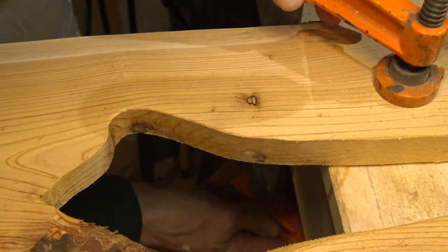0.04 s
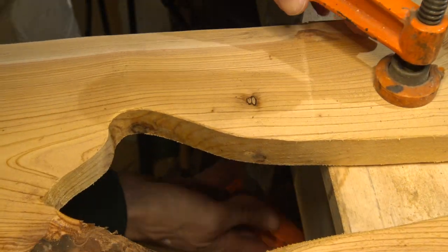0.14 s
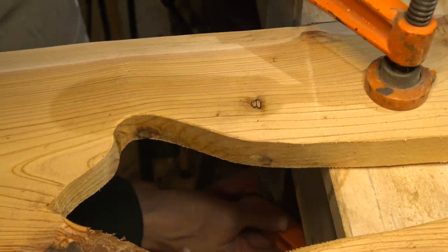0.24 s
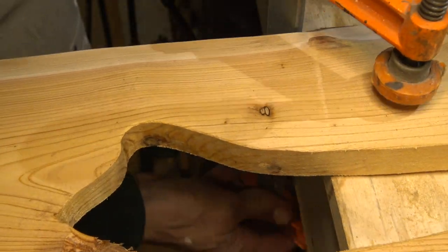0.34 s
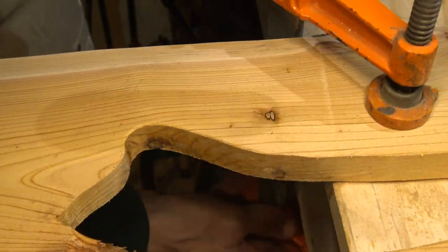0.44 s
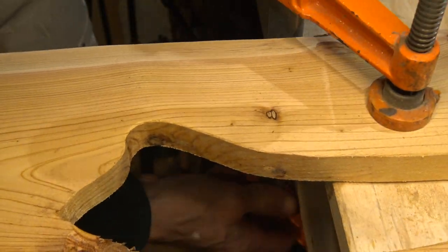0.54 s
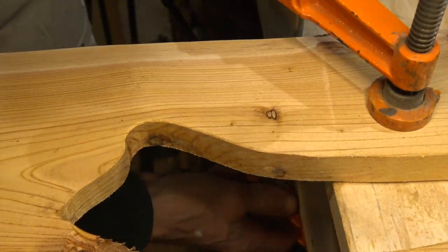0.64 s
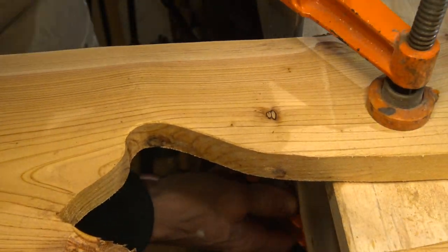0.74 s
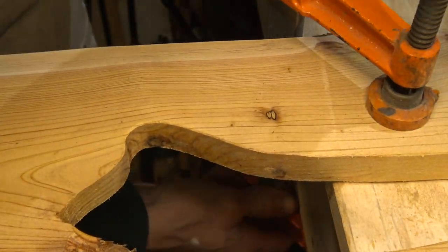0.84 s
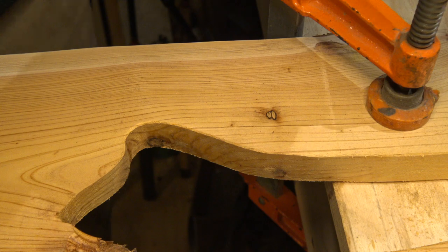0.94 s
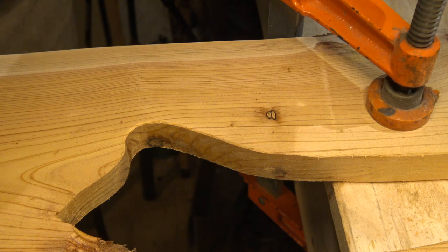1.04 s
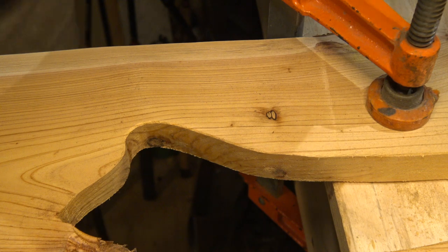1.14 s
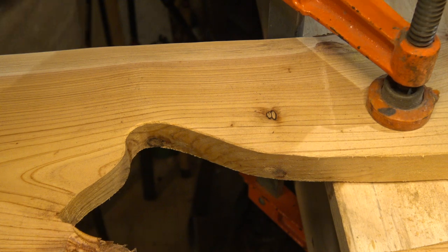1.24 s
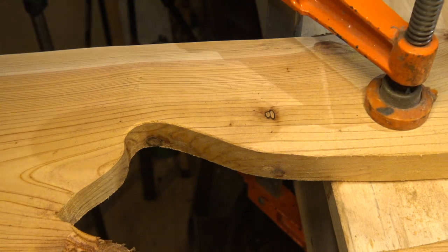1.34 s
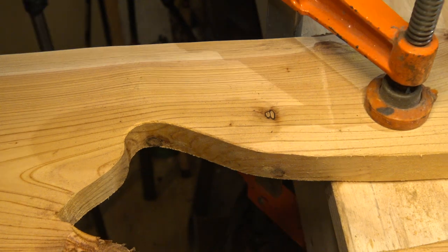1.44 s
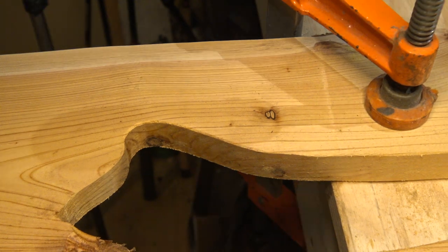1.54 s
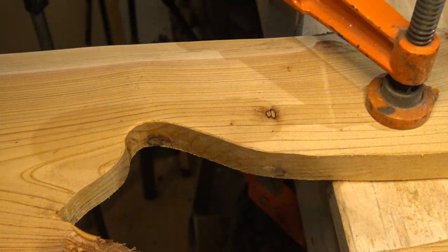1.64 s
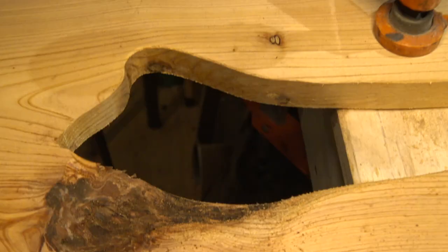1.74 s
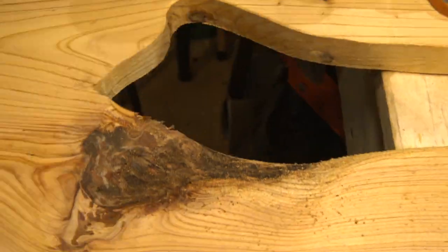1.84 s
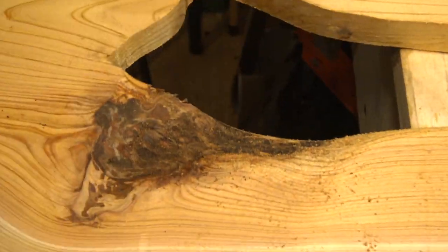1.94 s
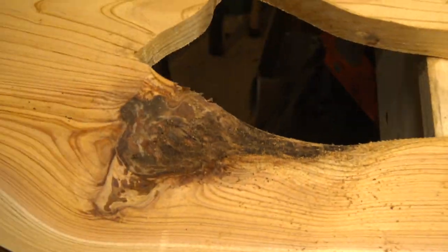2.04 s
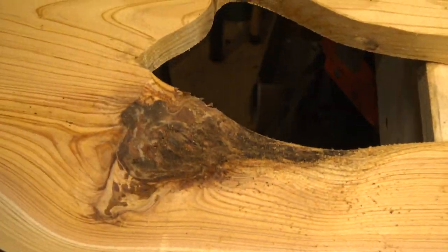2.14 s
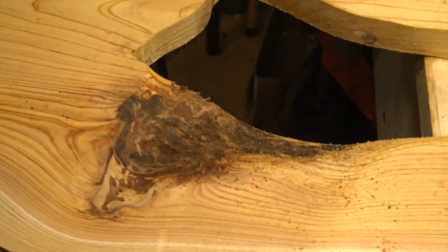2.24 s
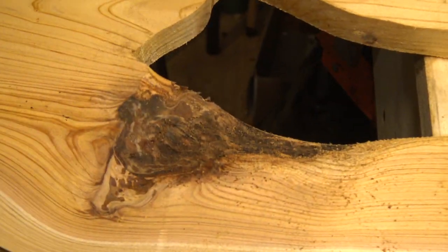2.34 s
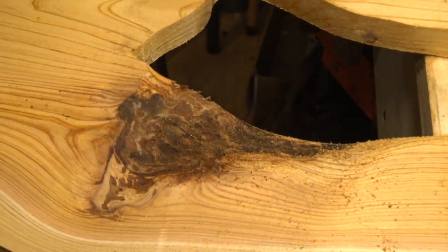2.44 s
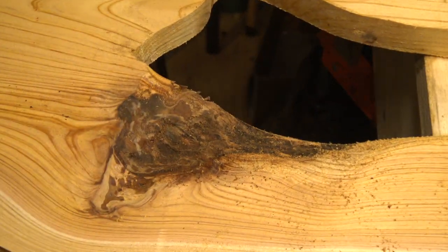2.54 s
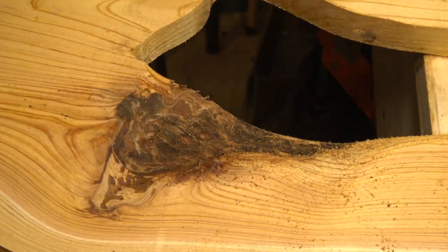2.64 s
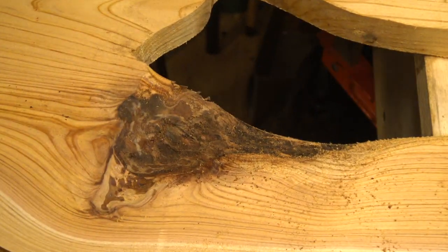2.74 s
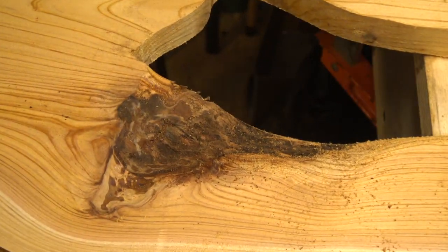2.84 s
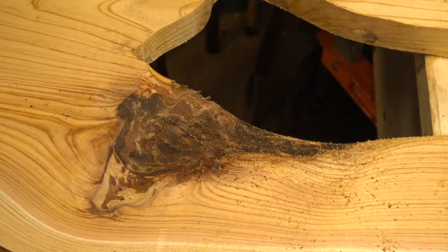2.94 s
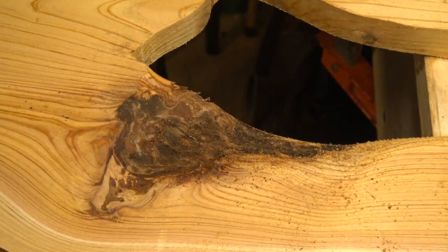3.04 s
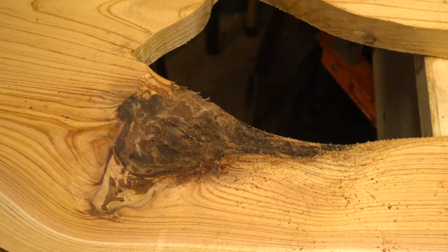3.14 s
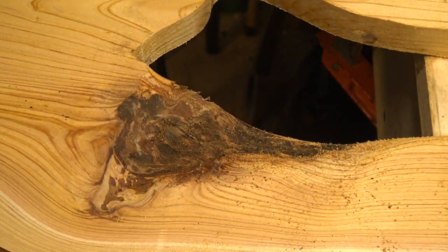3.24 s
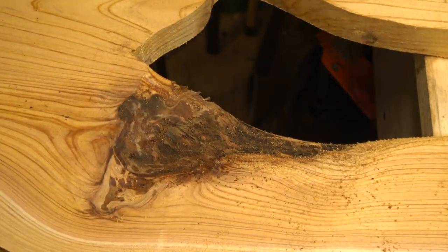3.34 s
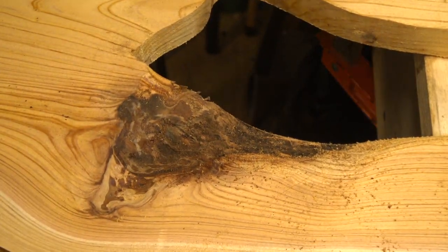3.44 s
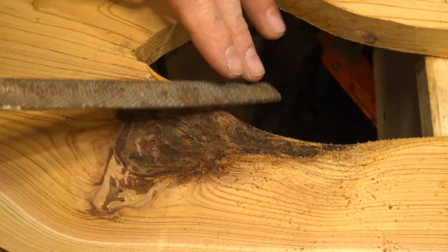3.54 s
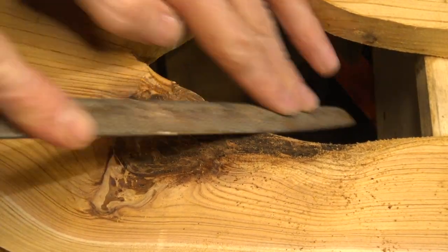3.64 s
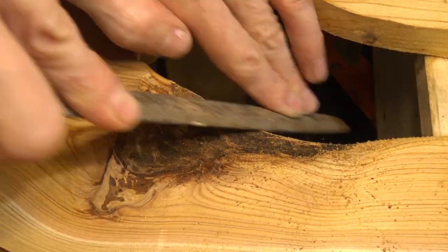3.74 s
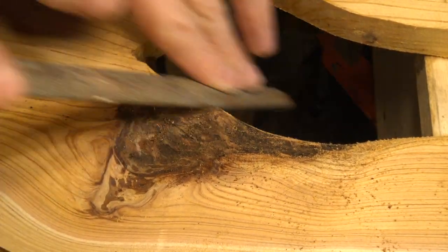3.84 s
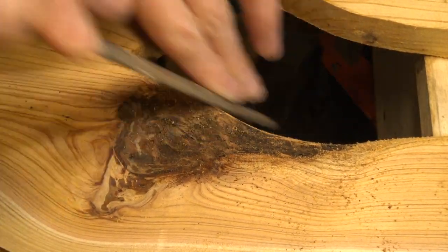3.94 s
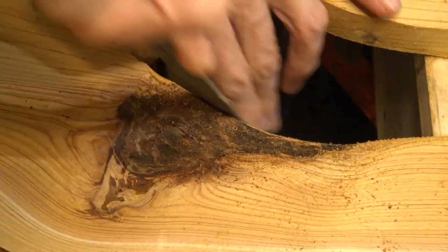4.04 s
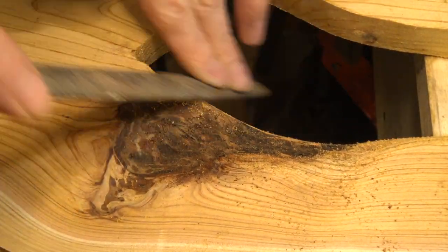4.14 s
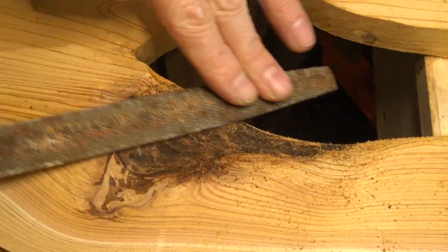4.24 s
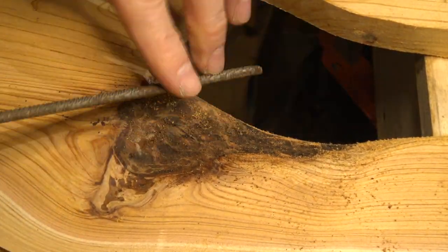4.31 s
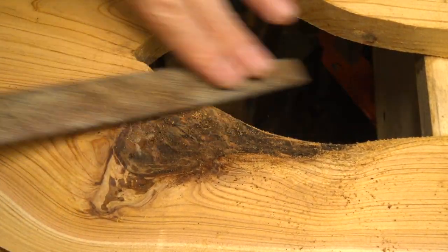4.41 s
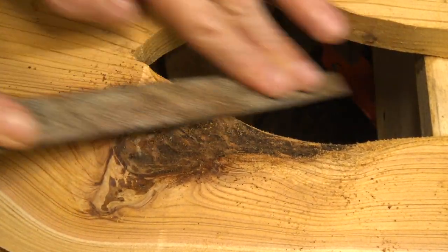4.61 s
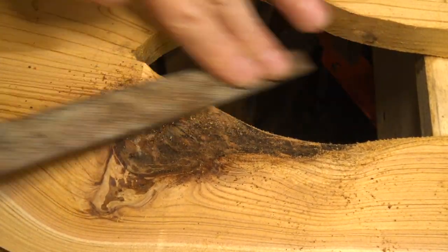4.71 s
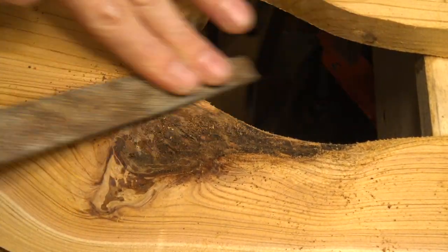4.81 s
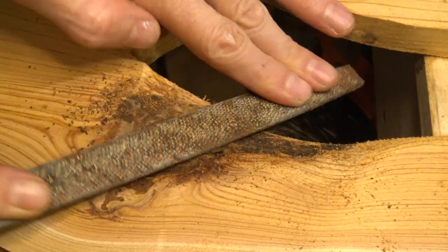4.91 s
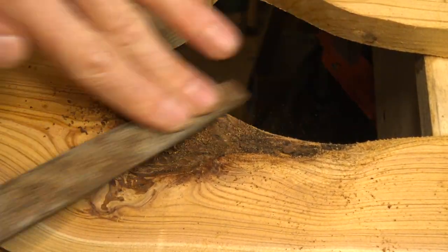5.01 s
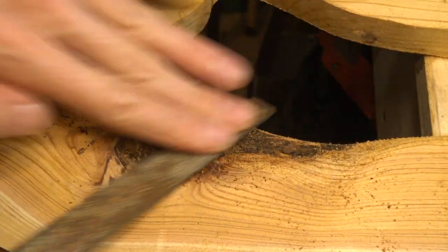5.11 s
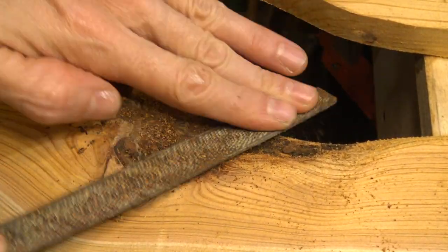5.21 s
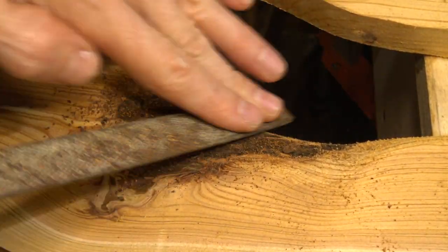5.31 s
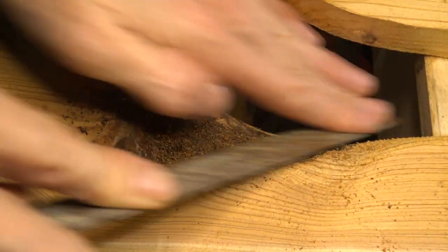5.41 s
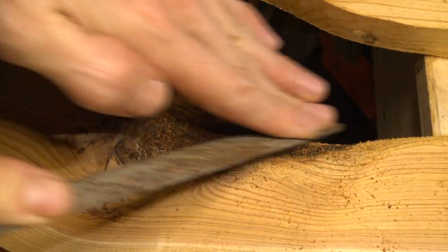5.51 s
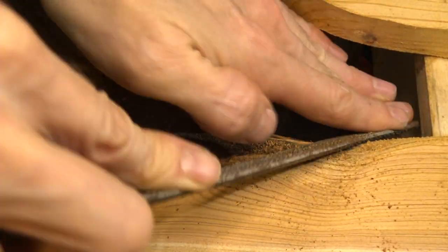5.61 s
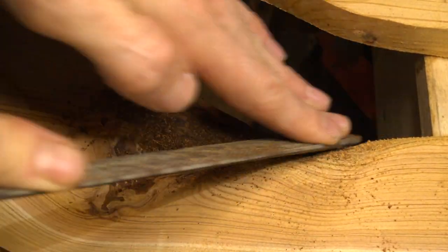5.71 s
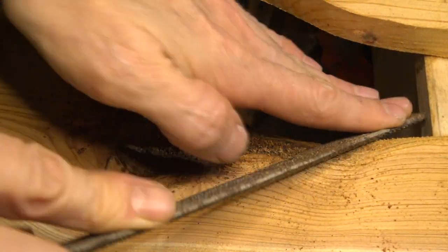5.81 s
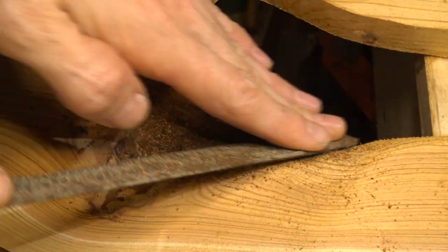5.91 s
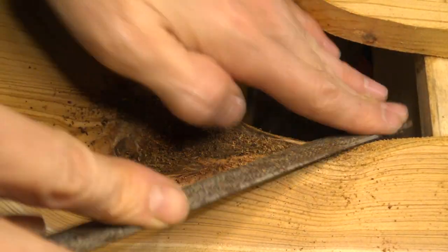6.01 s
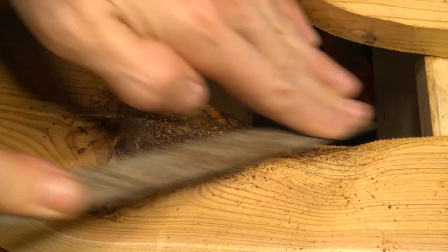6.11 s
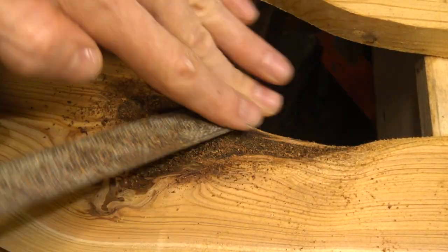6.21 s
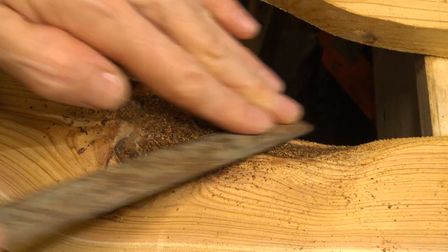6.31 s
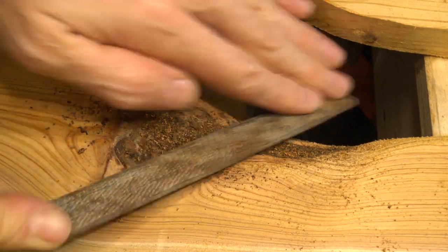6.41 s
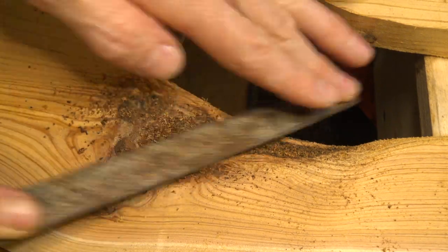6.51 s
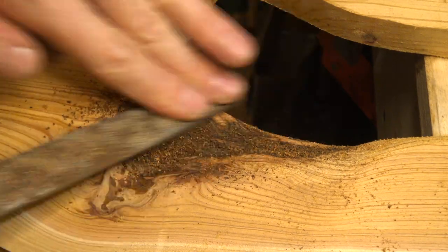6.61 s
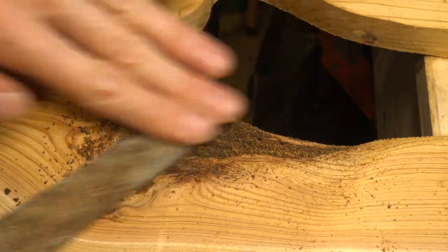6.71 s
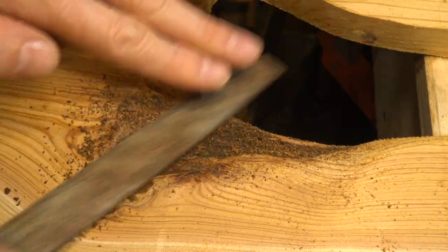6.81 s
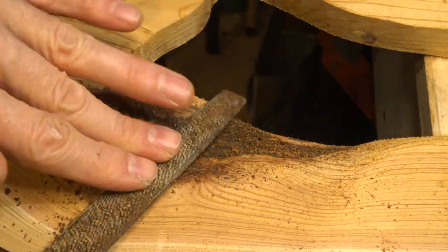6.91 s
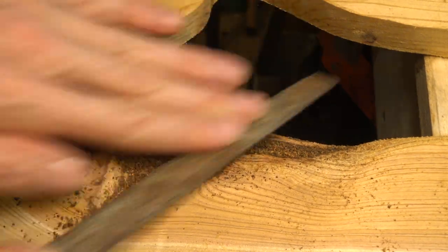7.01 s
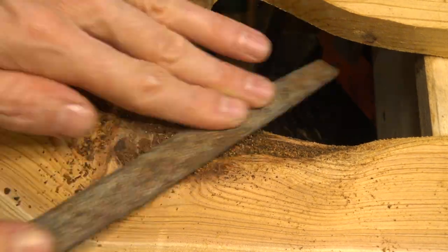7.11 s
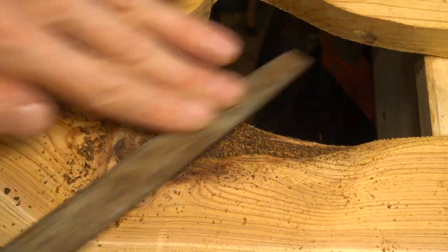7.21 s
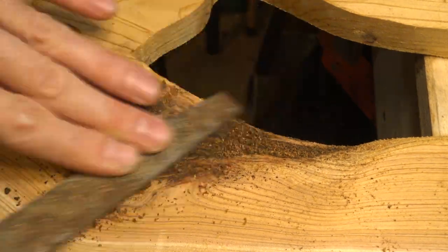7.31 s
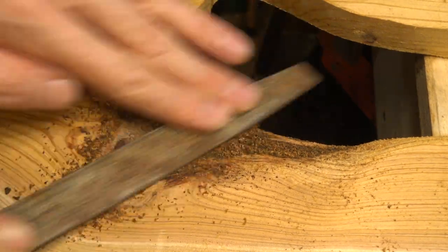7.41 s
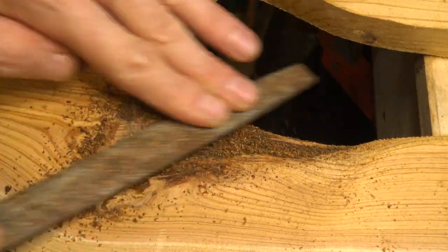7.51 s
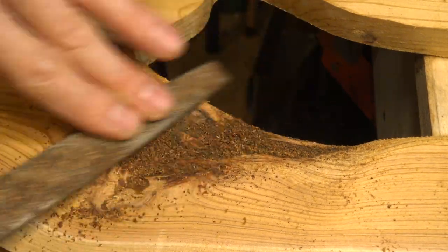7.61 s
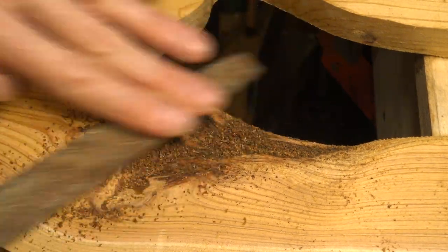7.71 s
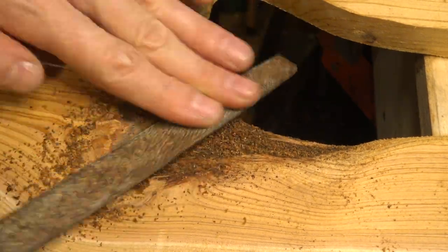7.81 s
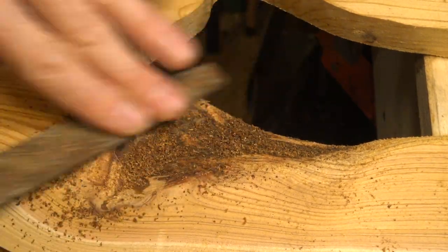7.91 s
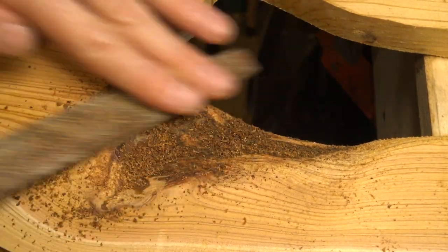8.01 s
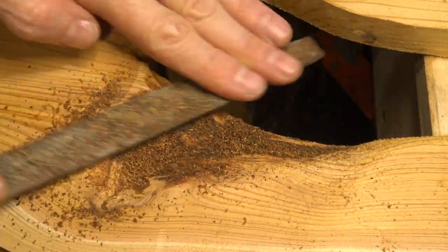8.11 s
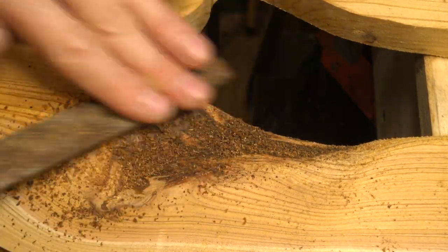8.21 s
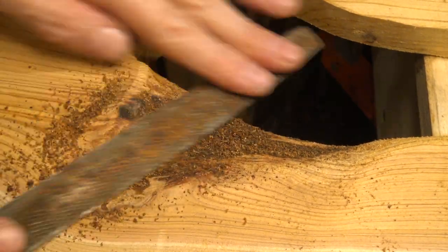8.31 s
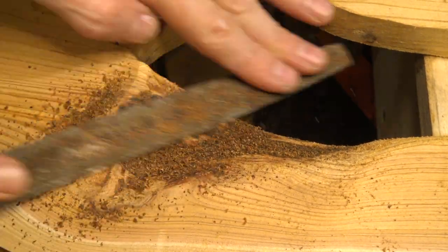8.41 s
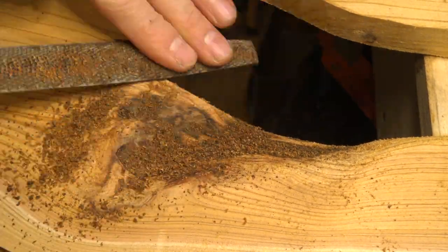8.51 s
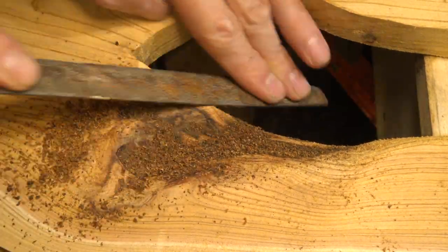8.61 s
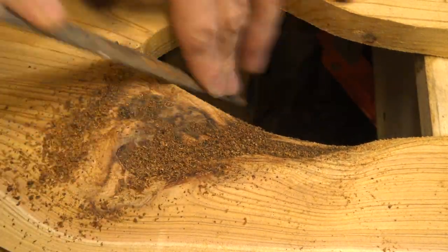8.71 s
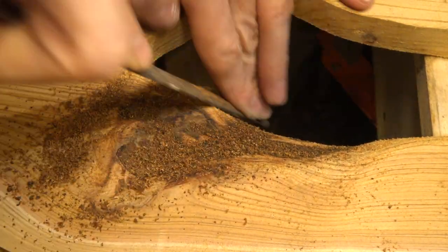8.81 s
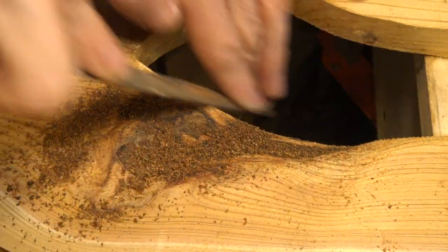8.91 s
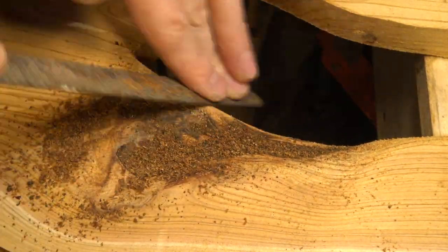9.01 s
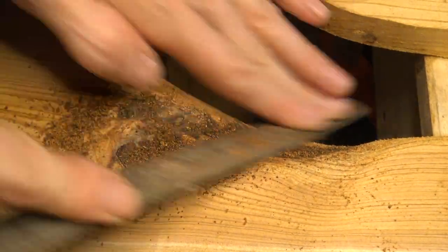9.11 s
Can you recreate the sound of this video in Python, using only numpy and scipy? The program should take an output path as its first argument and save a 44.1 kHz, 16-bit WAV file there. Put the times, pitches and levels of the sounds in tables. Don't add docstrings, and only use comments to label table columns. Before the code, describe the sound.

In a small workshop heard many times faster than life, a clamp bumps along a bench and clanks as its screw tightens in the first second and a half. Faint hiss and thin steady tones remain, with a few tiny ticks. Then a steel rasp saws at wood dozens of strokes a second, a gritty, bright, fluttering buzz with brief gaps, close and dry in stereo.

```python
import sys
import numpy as np
from scipy import signal
from scipy.fft import rfft, irfft
from scipy.io import wavfile
from scipy.ndimage import uniform_filter1d, map_coordinates

SR = 44100
rng = np.random.default_rng(int(sys.argv[2]) if len(sys.argv) > 2 else 0)


def digitize_waveform(pressure):
    field = np.atleast_2d(pressure).T
    bounded = np.clip(field, -1, 1)
    quanta = np.round(bounded * 32767).astype(np.int16)
    wavfile.write(sys.argv[1], SR, quanta)


def invert_db(level):
    return 10 ** (np.asarray(level, dtype=float) / 20)


N = 403515
TIME = np.arange(N) / SR


def evened(x):
    return x / np.sqrt(np.mean(x ** 2) + 1e-20)


def wander(samples):
    return evened(uniform_filter1d(rng.standard_normal(N), samples))


def read(points, hz):
    f, value = np.transpose(points)
    return np.interp(np.log(hz + 1), np.log(f + 1), value)


def ring(x, modes, valley_db):
    hz = np.fft.rfftfreq(8192, 1 / SR)
    power = sum(invert_db(db) ** 2 / (1 + (2 * (hz - f) / w) ** 2) ** 2 for f, w, db in modes)
    fold = irfft(np.log(power + invert_db(valley_db) ** 2) / 2)
    fold[1:4096] *= 2
    fold[4097:] = 0
    taps = irfft(np.exp(rfft(fold)))[:4096]
    return signal.oaconvolve(x, taps / np.linalg.norm(taps))[:N]


def grit(lumpy_db, count):
    lumps = np.clip(wander(count), -3, 1.8)
    return evened(rng.standard_normal(N) * invert_db(lumpy_db * lumps))


def thin(x):
    return signal.sosfilt(signal.butter(3, 240, "high", fs=SR, output="sos"), x)


def ports(x, balance, apart_db):
    tilt = invert_db(read(balance, np.fft.rfftfreq(N, 1 / SR)) / 2)
    echo = thin(thin(rng.standard_normal(600) * invert_db(-60 * np.arange(600) / 600)))
    shade = invert_db(apart_db + 4.5 * wander(1500))
    side = signal.oaconvolve(x, echo / np.linalg.norm(echo))[:N] * shade
    left = irfft(rfft(x) * tilt, N) + side
    right = irfft(rfft(x) / tilt, N) - side
    return np.array([left, right])


def shop():
    # (pitch_hz, level_db per Hz)
    hiss = [(59, -49), (100, -20.5), (413, -10), (671, -2.5), (1270, -11.5), (1560, -4.5), (1850, -11),
            (3890, -22), (4700, -21), (5010, -21.5), (13500, -26.5), (15700, -32)]
    # (pitch_hz, level_db, width_hz)
    tones = [(673, -54.5, 5.0), (1544, -45.3, 1.5), (1985, -67, 8), (2315, -63, 4.5), (4635, -62, 7)]
    # (time_s, level_db)
    lamp = [(0, -1), (1.4, -0.5), (1.95, -3.5), (2.5, -2.5), (2.8, 0), (3.6, -1.5), (9.15, -13)]
    # (start_s, length_s, level_db)
    rumble = [(1.357, 0.32, -59), (2.5, 0.38, -66), (4.1, 0.24, -56), (4.696, 0.56, -56), (5.5, 0.22, -59),
              (6.15, 0.27, -60), (7.783, 0.163, -50), (8.02, 0.4, -53)]

    hz = np.fft.rfftfreq(N, 1 / SR)
    coloured = irfft(rfft(grit(1.0, count=900)) * invert_db(read(hiss, hz)), N)
    out = invert_db(-46.5) * evened(coloured)
    swell = invert_db(np.interp(TIME, *np.transpose(lamp)))
    for f, db, width in tones:
        drift, flutter = wander(3000), wander(3000)
        turns = np.cumsum(f + width / 2 * drift) / SR
        out += np.sqrt(2) * invert_db(db + .2 * width * flutter) * swell * np.sin(2 * np.pi * turns)
    for s, length, db in rumble:
        u = np.clip((TIME - s) / length, 0, 1)
        out += invert_db(db) * np.sin(np.pi * u ** 0.67) * np.sin(2 * np.pi * 96 * TIME)
    return out


def knocks():
    # (start_s, length_ms, board_db,
    # scrape_db)
    bumps = [(0.01, 6.5, -33.5, -47), (0.085, 12, -37, -45), (0.098, 12, -37, -48), (0.188, 7.2, -32, -41),
             (0.205, 13, -38, -44), (0.235, 4.7, -36, -54), (0.289, 12, -37, -53), (0.361, 9.6, -23.5, -33),
             (0.429, 16, -35, -64), (0.442, 17.3, -27.5, -25.5), (0.547, 13, -34, -60),
             (3.58, 4, -25.5, -40)]
    # (start_s, length_ms,
    # frame_db, board_db)
    clanks = [(0.681, 4.3, -44, -45), (0.703, 16, -37, -44), (0.72, 11.3, -23.5, -39.5),
              (0.786, 11.3, -33, -33), (0.849, 6.9, -30.5, -33.5), (0.867, 2.3, -25, -34),
              (0.9158, 3.3, -24, -26), (0.922, 11, -28.5, -31.5), (1.004, 7.7, -21.5, -31),
              (1.054, 8.7, -37, -48), (1.086, 12, -22.5, -40), (1.118, 8.8, -18.5, -36),
              (1.143, 9.4, -44, -57), (1.174, 15, -20, -36), (1.201, 5.6, -14.5, -33),
              (1.24, 3.5, -32, -43), (1.268, 19, -19.5, -32), (1.337, 16, -34.5, -39),
              (2.532, 8.8, -43, -46), (3.39, 5, -25.5, -47), (6.961, 21, -40, -37)]
    # (start_s, length_ms, scrape_db, frame_db)
    scrapes = [(0.72, 7.2, -28.5, -40), (0.777, 4.4, -36, -30), (0.947, 5.7, -38, -30.5),
               (1.301, 5.4, -40, -42), (1.358, 11, -38, -44), (1.37, 20, -36.5, -51), (2.572, 34, -47, -50),
               (2.612, 9.5, -39.5, -36.5), (3.348, 26, -42.5, -50), (3.518, 33, -49, -61),
               (6.963, 16, -36, -40)]

    bumped = [(s, ms, board, board - 7.5, scrape) for s, ms, board, scrape in bumps]
    clanked = [(s, ms, board, frame, frame - 16) for s, ms, frame, board in clanks]
    scraped = [(s, ms, frame - 10, frame, scrape) for s, ms, scrape, frame in scrapes]
    return bumped + clanked + scraped


def clamp():
    # (pitch_hz, width_hz, level_db)
    bench_modes = [(325, 46, -1), (447, 110, 3), (665, 240, 1), (900, 170, -9.5), (1450, 2600, -15)]
    free_modes = [(2180, 490, 8), (2220, 1060, -15.5), (2900, 170, -17), (5410, 480, -7)]
    held_modes = [(1860, 1320, 4.5), (4020, 490, -8)]
    screw_modes = [(4800, 1300, -7), (7260, 500, -28), (8100, 810, -4), (9800, 1500, -5.5),
                   (13100, 3800, -10)]

    shapes = np.zeros((3, N))
    for s, ms, *level_db in knocks():
        part = shapes[:, round(s * SR):][:, :SR // 2]
        u = TIME[:part.shape[1]] / (ms / 1000)
        shape = np.sin(np.pi * np.minimum(u, 1) ** 0.89) + 0.13 * np.exp(-u / 1.8) * (u > 0)
        part[:] = np.maximum(part, invert_db(np.array(level_db))[:, None] * shape)
    turning = abs(TIME - 1.08) < .25
    rattle = invert_db(-64.0 + 25.4 * np.tanh(wander(200))) * (abs(TIME - 1) < .34)
    late = np.roll(shapes[0], round(0.0032 * SR))
    bench = invert_db(5.5) * ring(grit(4.9, count=30) * late, bench_modes, -41)
    shake = grit(3.5, count=30) * (shapes[1] + rattle)
    scrape = grit(1.2, count=20) * shapes[2]
    frame = ring(shake * turning, free_modes, -26) + ring(shake * ~turning, held_modes, -39)
    return thin(bench + frame + ring(scrape, screw_modes, -13))


def walls(x):
    t = np.arange(4000) / SR
    dull = signal.lfilter([1], [1, -.6], rng.standard_normal(4000))
    tail = dull * invert_db(-60 * t / 0.014) * (t > .001)
    return signal.oaconvolve(x, tail / np.linalg.norm(tail))[:N]


def thud():
    # (pitch_hz, level_db, t60_s)
    parts = [(70, -49, .06), (473, -16, 0.039)]
    t = np.maximum(TIME - .363, 0)
    return sum(invert_db(db - 60 * t / t60) * np.sin(2 * np.pi * hz * t) for hz, db, t60 in parts)


def ticks():
    # (start_s, peak_db, pitch_hz)
    touches = [(1.6985, -17.5, 12200), (1.821, -25.5, 6460), (1.848, -23, 2920), (1.861, -32, 10000),
               (2.454, -17, 7200), (2.477, -32, 11000), (2.489, -38, 14500), (2.666, -32, 8500),
               (3.552, -21, 4800), (8.299, -6, 5000)]
    out, t = np.zeros(N), np.arange(400) / SR
    for s, db, hz in touches:
        tone = np.sin(2 * np.pi * hz * t) * invert_db(-60 * t / 0.0016)
        click = .5 * rng.standard_normal(400) * invert_db(-60 * t / 0.00096)
        out[round(s * SR):][:400] += invert_db(db) * (tone + click)
    return out


def strokes():
    # (time_s, bite_db of the teeth, extra push_bite_db, weight_db on the board, drag_db on bare wood)
    hands = np.array([(3.6, -18, 0.5, -37.5, -30), (4.1, -20.5, -3.5, -37.5, -30.5),
             (4.3, -20, 4, -31.5, -26.5), (4.43, -18, 2, -35, -22.5), (4.75, -18.5, 2, -28, -27.5),
             (5.0, -19, 0.2, -36, -27), (5.28, -17, 1, -32, -29.5), (5.58, -21, -1, -34.5, -26.5),
             (5.85, -19.5, -1, -37, -30.5), (6.15, -18, 0.7, -35.5, -28), (6.38, -16.5, 0, -38, -26.5),
             (6.6, -19, -0.5, -30, -28), (6.85, -15.5, 3, -39.5, -27), (7.2, -17, 1.5, -32.5, -28),
             (7.75, -19, 2.5, -30, -26), (8.1, -17, 4, -32.5, -26), (8.45, -19, 0.3, -32.5, -28),
             (8.8, -18.5, -1.5, -37, -26.5)])
    # (turn_s, number of the stroke it starts)
    pace = [(3.602, 3), (3.636, 4), (3.682, 6), (3.865, 14), (4.031, 22), (4.228, 32), (4.277, 34),
            (4.386, 39), (4.494, 44), (4.693, 54), (4.947, 66), (5.027, 70), (5.247, 80), (5.495, 92),
            (5.929, 114), (6.22, 128), (6.321, 132), (6.674, 148), (6.714, 150), (6.91, 158), (6.983, 161),
            (7.01, 162), (7.635, 190), (8.357, 224), (8.402, 226), (8.737, 242), (8.988, 254)]
    # (start_s, stroke number, bite_db)
    breaks = [(3.5527, 0, -14), (3.561, 1, -41), (3.578, 2, -44), (4.193, 30, -25.5), (4.251, 33, -26),
              (4.343, 37, -47), (4.371, 38, -35), (5.81, 108, -26.5), (6.248, 129, -20.5), (6.26, 130, -23),
              (6.285, 131, -20), (6.937, 159, -19), (6.947, 160, -35), (7.888, 202, -24.5),
              (8.275, 220, -31.5), (8.298, 221, -19.5), (8.309, 222, -37), (8.329, 223, -20),
              (8.895, 250, -29.5), (9.157, 262, -36)]

    at, number = np.transpose(sorted(pace + [row[:2] for row in breaks]))
    order = np.arange(round(number[-1]) + 1)
    late, scatter = rng.standard_normal((len(order), 2)).T
    shift = .0007 * late - .0015 * (order % 2)
    s = np.interp(order, number, at) + shift * ~np.isin(order, number)
    bite_db, lean_db, weight_db, wood_db = (np.interp(s, hands[:, 0], c) for c in hands[:, 1:].T)
    bite_db = bite_db + lean_db * (-1) ** order + 1.1 * scatter
    for _, k, db in breaks:
        bite_db[k] = db
    return s, bite_db, weight_db, wood_db


def rasp():
    # (pitch_hz, width_hz, level_db)
    steel_modes = [(3362, 120, -10), (3455, 63, -5), (3740, 360, -13.5), (4830, 610, -5.5), (4854, 105, -5),
                   (5445, 303, -3), (6010, 270, -6), (6270, 1100, -11), (7196, 550, -10),
                   (7990, 560, -10.5), (9310, 950, -11.5), (9860, 370, -9.5), (10540, 440, -13.5),
                   (11300, 770, -15), (12940, 1300, -18), (14700, 850, -13), (13300, 760, -15),
                   (15800, 730, -13.5)]
    wood_modes = [(1406, 99, -2.5), (1557, 175, 0), (1930, 73, 0), (2170, 770, 0.5), (2530, 250, -31),
                  (2904, 94, -6)]
    board_modes = [(93.5, 36, -30.5), (296, 39, -0.5), (367, 95, -4), (437, 116, -2.5), (546, 49, 2),
                   (642, 210, -8.5), (764, 160, -12.5), (1085, 310, -31)]

    s, bite_db, weight_db, wood_db = strokes()
    order = np.arange(len(s))
    push = (-1) ** order
    fine_db = -2.6 + 0.38 * (weight_db - weight_db.mean()) - 4.8 * push
    weaker_db = np.minimum(bite_db, np.roll(bite_db, 1))
    jolt_db = weight_db + 9.5 * push + 0.54 * np.minimum(weaker_db + 15.5, 0)
    place = np.interp(TIME, s, order, left=-1)
    k = np.clip(place.astype(int), 0, len(s) - 2)
    lasts_s = np.diff(s)[k]
    chance = rng.standard_normal((len(s), 26))

    tap = (np.diff(bite_db)[k] < -13) & (lasts_s < .016)
    lean = np.clip(.85 - 0.16 * (k % 2) + 0.2 * chance[k, 25], .4, 1.2)
    arc = np.sin(np.pi * (place % 1) ** np.where(tap, .2, lean))
    speed = np.tanh(1.46 * arc ** (70 * lasts_s))
    rest = invert_db(np.interp(place, order, weaker_db - 24.0 + 7.3 * chance[:, 0]))
    drive = (rest + speed * np.maximum(invert_db(bite_db[k]) - rest, 0)) * (place >= 0)
    pressure = drive / uniform_filter1d(drive + 1e-4, 8000) * invert_db(1.13 * chance[k, 1])
    drag = grit(1.24, count=60) * pressure ** 0.64 * invert_db(wood_db[k] - 1.97)
    wood = ring(drag, wood_modes, -18.5)
    steel = ring(grit(2.2, count=12) * drive, steel_modes, -26)
    hz, t, z = signal.stft(steel + wood, SR, nperseg=128)

    spot = np.interp(t, s, order)
    colour = map_coordinates(chance[:, 2:], np.meshgrid(spot - .5, hz / 660), order=1, mode="nearest")
    grip = evened(uniform_filter1d(rng.standard_normal((len(s), 40)), 9, axis=0))
    grip = map_coordinates(grip, np.meshgrid(spot, hz / 600), order=1, mode="nearest")
    spots_db = 3.0 * colour + 2.0 * grip - 1.4
    treble = np.clip(hz / 2500 - 3.1, 0, 1)[:, None]
    z = z * invert_db(spots_db + fine_db[spot.astype(int)] * treble)
    teeth = thin(signal.istft(z, SR, nperseg=128)[1][:N])

    jolt = invert_db(np.interp(TIME + 0.011, s, jolt_db, left=-99)) * (1.04 + 0.37 * np.cos(2 * np.pi * place))
    at = s[::2] - .011
    last = np.maximum(np.searchsorted(at, TIME) - 1, 0)
    blow = invert_db(jolt_db[::2][last] + 4) * np.exp(-abs(TIME - at[last]) / 0.0052) * (TIME > s[0])
    shaken = grit(2.5, count=40) * (invert_db(1.0) * jolt + blow)
    return teeth + ring(shaken, board_modes, -44)


def scene():
    # (pitch_hz, balance_db)
    work_side = [(110, 0), (600, 2.4), (1290, .5), (2380, -1), (4400, 0), (8120, -1), (15000, 0)]
    room_side = [(200, 0), (700, 1.5), (1400, 4.5), (2380, 2), (4400, -3), (9000, -.5)]
    work = rasp() + clamp() + thud() + thin(ticks())
    work = work + invert_db(-20) * walls(work)
    return ports(work, work_side, -22) + ports(shop(), room_side, -19)


def low_pass(x):
    return signal.sosfilt(signal.butter(12, 16690, fs=SR, output="sos"), x)


def record(dry):
    edge = signal.firwin(401, 15800, window=("kaiser", 5), fs=SR)
    held = .55 * np.tanh(dry / .55)
    return low_pass(signal.oaconvolve(held, edge[None], "same", axes=1))


dry = scene()
out = record(dry)
digitize_waveform(out)
```